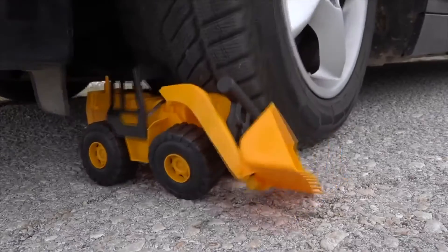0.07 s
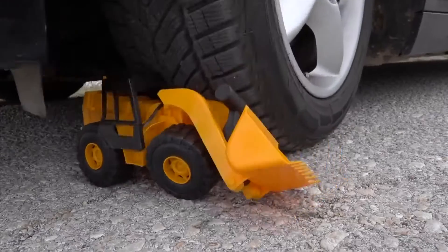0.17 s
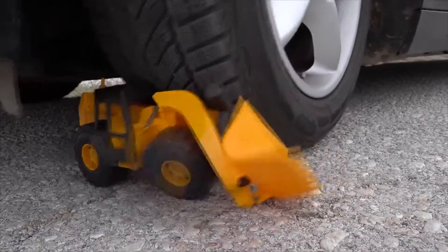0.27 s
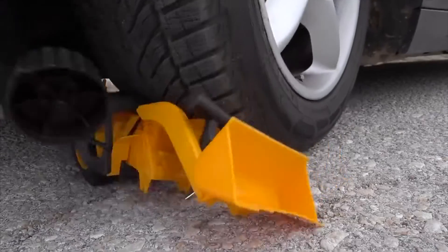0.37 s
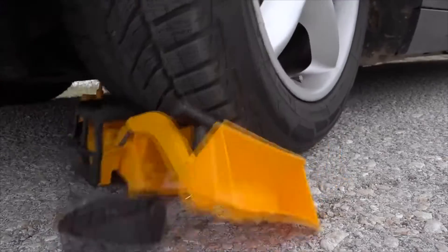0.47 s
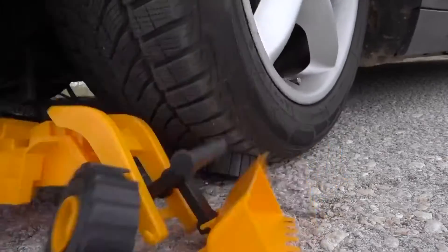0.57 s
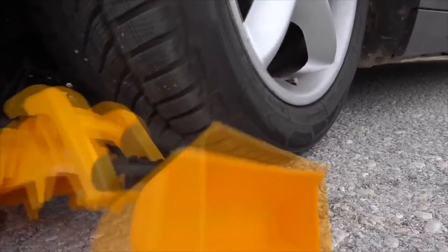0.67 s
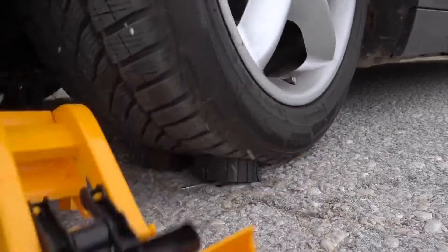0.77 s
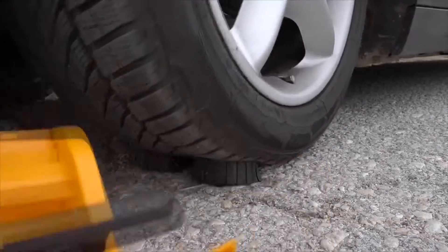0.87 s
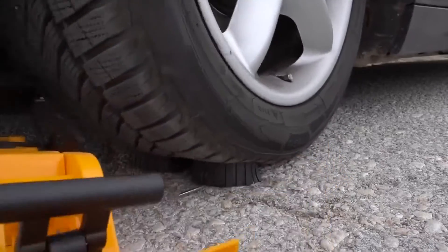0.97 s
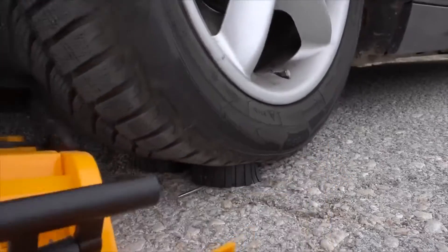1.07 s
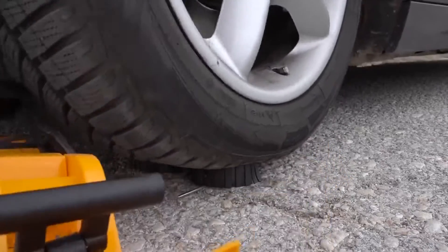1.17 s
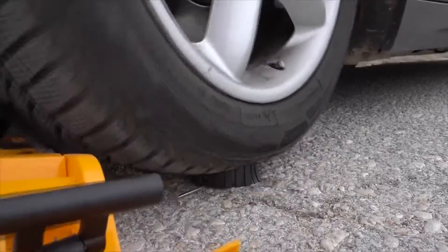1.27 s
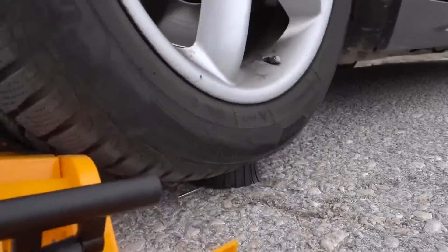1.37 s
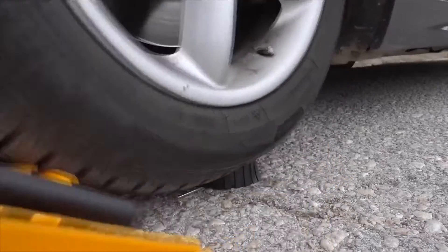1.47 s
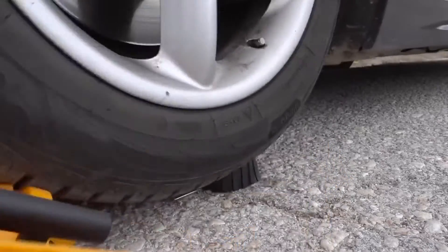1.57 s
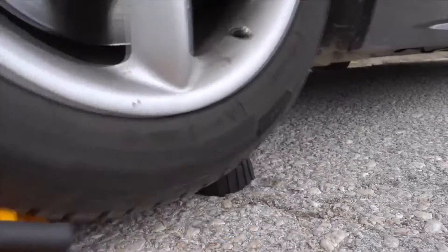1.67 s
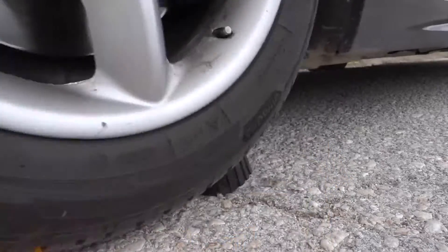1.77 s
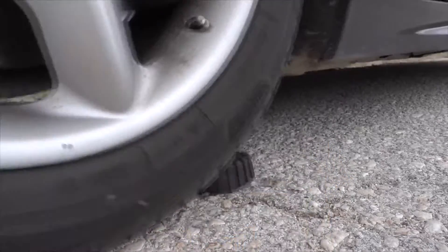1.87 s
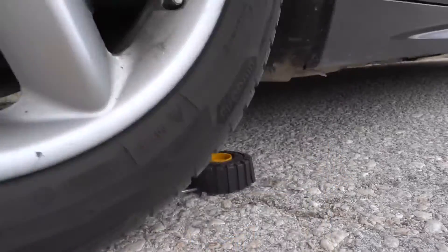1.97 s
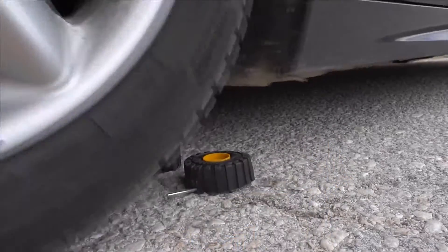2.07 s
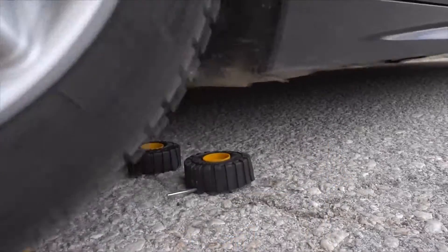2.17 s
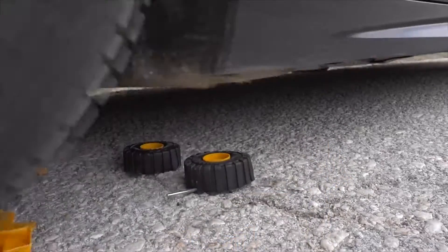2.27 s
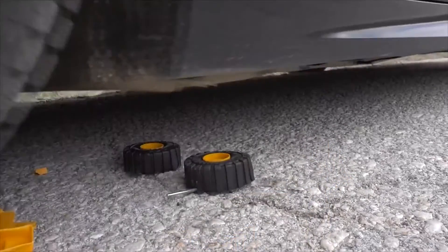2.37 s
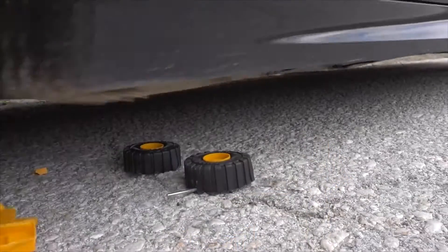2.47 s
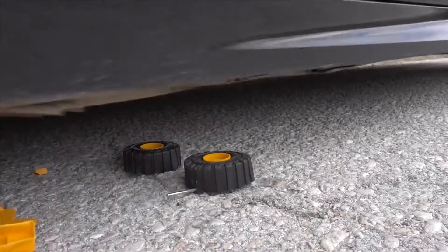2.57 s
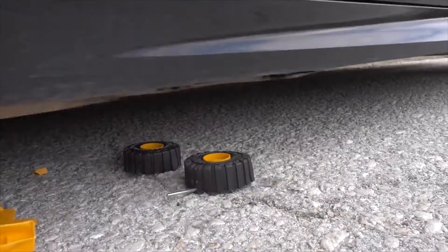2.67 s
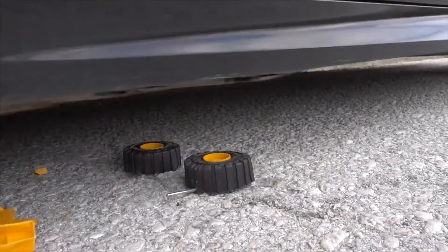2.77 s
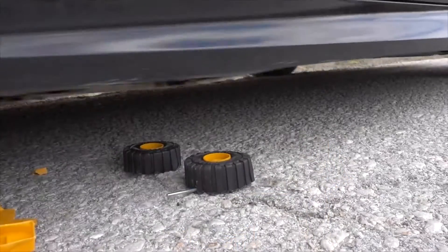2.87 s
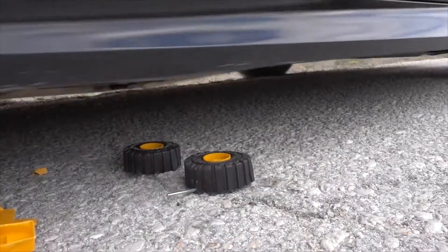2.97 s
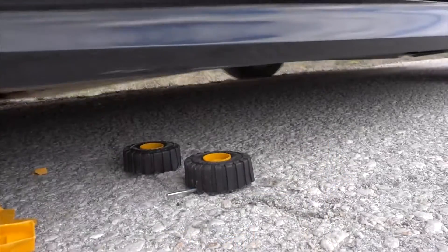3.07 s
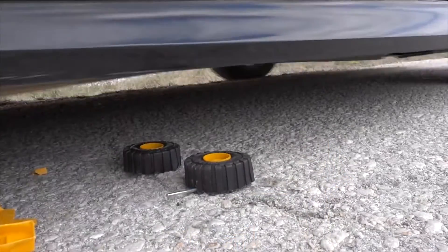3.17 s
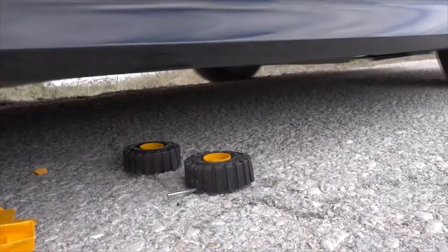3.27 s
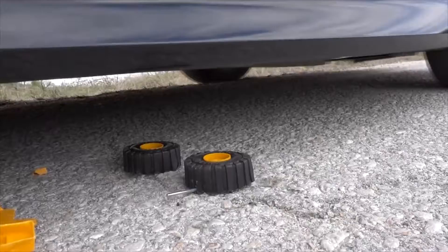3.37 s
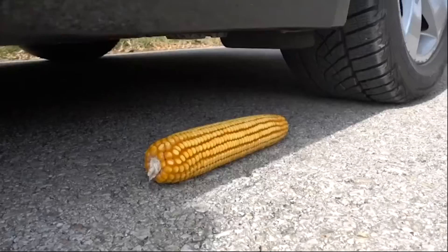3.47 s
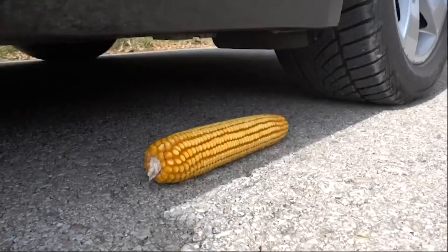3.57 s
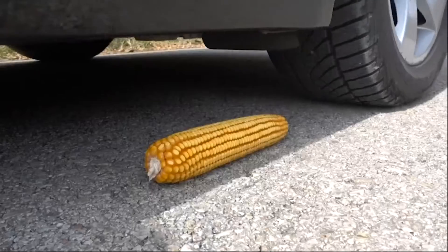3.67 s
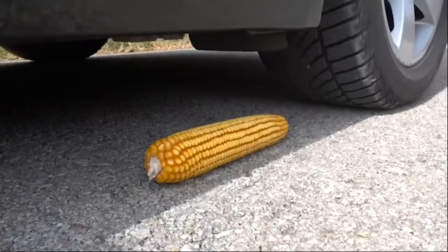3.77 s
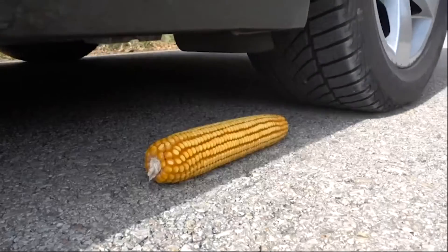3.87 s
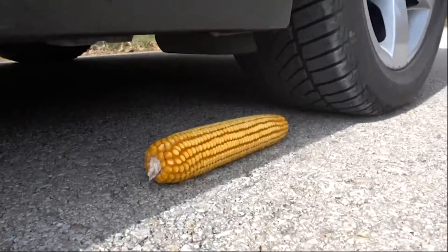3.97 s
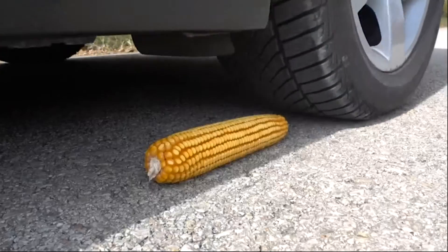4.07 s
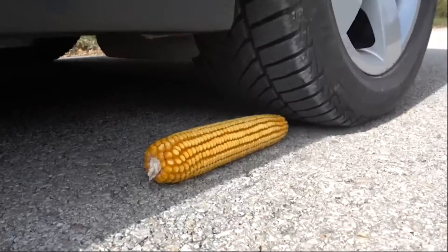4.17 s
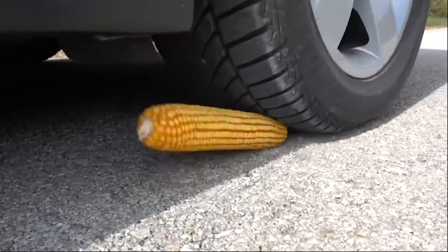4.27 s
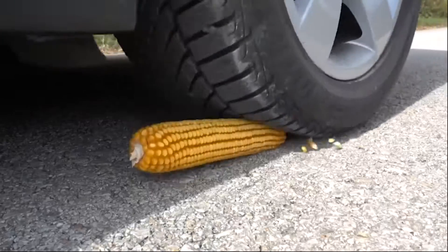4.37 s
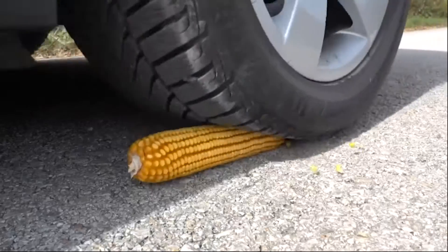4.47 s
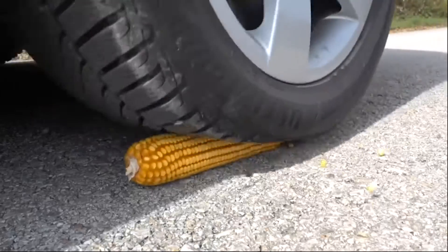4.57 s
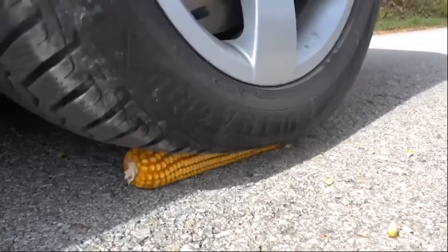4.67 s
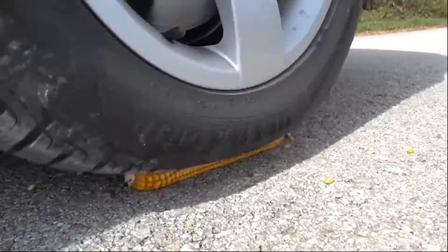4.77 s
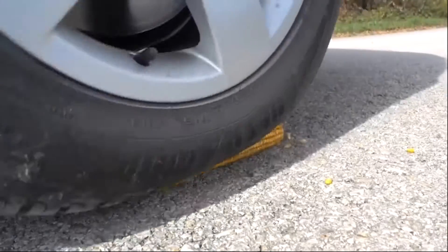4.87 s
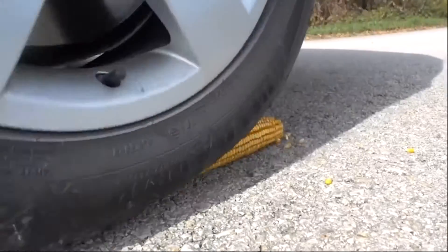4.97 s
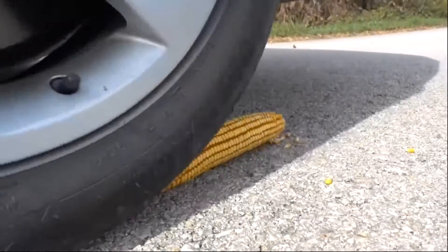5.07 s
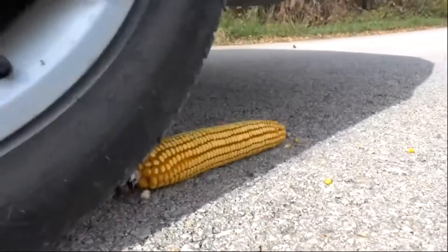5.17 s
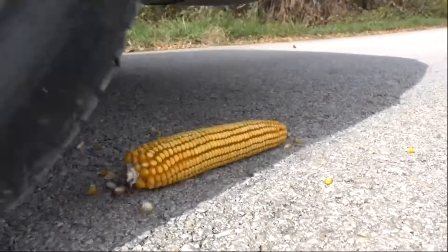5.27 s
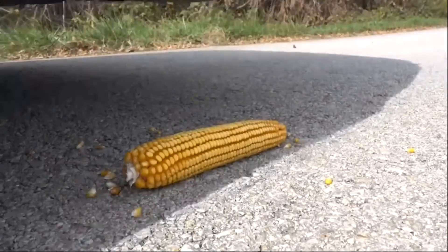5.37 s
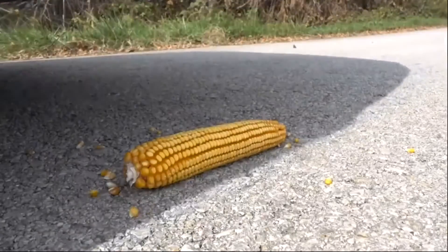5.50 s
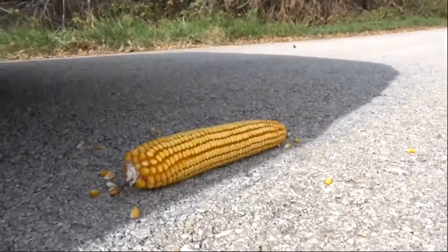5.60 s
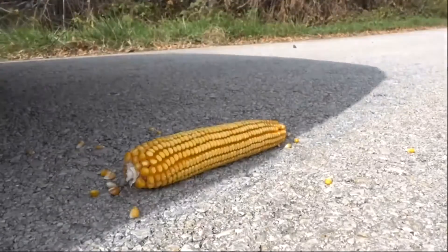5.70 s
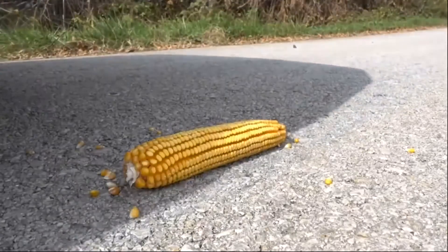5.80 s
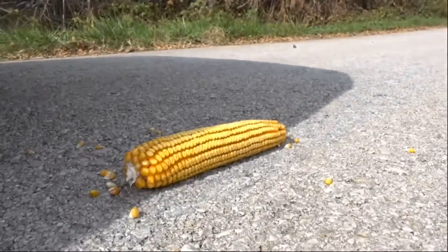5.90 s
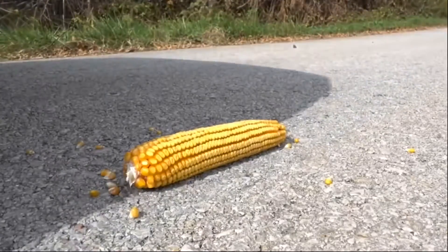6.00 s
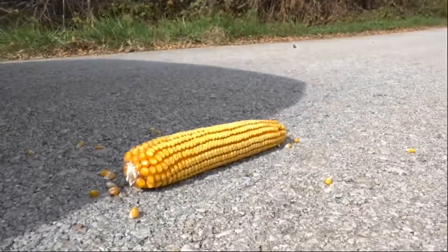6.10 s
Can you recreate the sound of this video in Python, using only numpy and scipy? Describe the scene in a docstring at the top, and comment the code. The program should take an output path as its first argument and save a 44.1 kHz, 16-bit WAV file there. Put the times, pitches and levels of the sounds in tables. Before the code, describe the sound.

Outdoors, very near the tyre, hard plastic shells split in a rapid, uneven series of snaps, with groaning drags and rubbery, plucked creaks midway. A second crushing burst follows, then small pieces tick and settle leftward. A short cut leads to a breezy roadside: low wind thumps, then a dry cob bursts into bright crackling grains and woody pops. The car hums away with a faint squeal while stray kernels click and wind swells.

```python
"""A car tyre rolls over a hollow plastic toy digger on asphalt, then along a dry maize cob in a breeze.
Toy: bursts of tearing noise ring cracked shells over patchy crackle; plucked modes make the wheel creak and
squawk, pulses groan, the hollow tube rings, and clicks and noise make shards tick, skitter and scrape.
A short cut, empty but for faint hiss, leads to the cob: dense grains and ticks crunch, the core pops with
swelling rings, kernels snap, the car hums by, and lumpy low noise makes the wind that buffets the microphone."""
import sys
import numpy as np
from scipy import signal
from scipy.fft import rfft, irfft, next_fast_len
from scipy.io import wavfile

SR = 44100
rng = np.random.default_rng(int(sys.argv[2]) if len(sys.argv) > 2 else 0)


def dump(signal):
    """Clip the signal to [-1, 1] and save it as 16-bit WAV at the path in sys.argv[1]."""
    limited = np.clip(np.atleast_2d(signal).T, -1, 1)
    pcm = np.round(limited * 32767).astype(np.int16)
    wavfile.write(sys.argv[1], SR, pcm)


N = 270685

# crunch colour of the plastic shells: f/Hz, relative level per Hz/dB
SHELL_COLOUR = [(150, -39), (250, -29.5), (420, -11.5), (499, -9.5), (624, -5), (961, -4), (1610, 0),
                (4240, -3), (7000, -11), (15500, -21)]
# ring modes of the cob core: multiple of its pitch, level/dB, t60/s
CORE_MODES = [(1.0, 1.5, 0.021), (.68, -7, 0.022), (1.4, -9, 0.019), (.37, -19, 0.013)]


def from_db(db):
    """Decibels to amplitude factor."""
    return 10 ** (np.asarray(db) / 20)


def rms_one(x):
    """Scale to an rms of 1."""
    return x / np.sqrt(np.mean(x ** 2) + 1e-20)


def in_time(rows):
    """Columns of a time table as curves of N samples."""
    s, *columns = np.transpose(rows)
    return [np.interp(np.arange(N) / SR, s, column) for column in columns]


def at_hz(points, hz):
    """Read a curve between its points on a log frequency axis."""
    point_hz, value = np.array(points).T
    return np.interp(np.log(hz), np.log(point_hz), value)


def drift(rate_hz):
    """Slow chance of spread 1: noise through two equal low-pass poles, computed at every 40th sample."""
    r = np.exp(-80 * np.pi * rate_hz / SR)
    noise = rng.standard_normal(N // 40 + 2002)
    slow = signal.lfilter([1], [1, -2 * r, r * r], noise)[2000:]   # past the filter's start
    return np.interp(np.arange(N) / 40, np.arange(len(slow)), rms_one(slow))


def ring(x, hz, t60):
    """Two-pole resonator: a unit click sets a decaying sine of starting height 1 ringing."""
    r, w = from_db(-60 / (t60 * SR)), 2 * np.pi * hz / SR
    return signal.lfilter([0, np.sin(w)], [1, -2 * r * np.cos(w), r * r], x + 1e-18)


def band(x, low_hz, high_hz):
    """Butterworth band-pass."""
    return signal.sosfilt(signal.butter(2, [low_hz, high_hz], "band", fs=SR, output="sos"), x)


def split(x, corner_hz):
    """Gentle low and high parts, each of rms 1."""
    low = signal.lfilter(*signal.butter(1, corner_hz, fs=SR), x)
    return rms_one(low), rms_one(x - low)


def grains(per_s, spread_db):
    """Two unrelated streams of random clicks of uneven size; rms 1."""
    size_db = spread_db * np.minimum(rng.exponential(1, (2, N)), 5)
    signs = rng.choice([-1, 1], (2, N))
    falls = rng.random((2, N)) < per_s / SR
    return rms_one(from_db(size_db) * signs * falls)


def coloured(pair, spectrum):
    """A mid and a side stream get a spectrum and the likeness of two microphone ports; rms 1."""
    # how alike left and right are: f/Hz, correlation
    likeness = [(60, 1), (180, 1), (550, 0.93), (1650, 0.47), (4970, 0.73), (15000, 0.07)]
    size = next_fast_len(N)
    hz = np.maximum(np.arange(size // 2 + 1) * SR / size, 10)
    alike = np.clip(at_hz(likeness, hz), 0, 1)
    mid, side = rfft(pair, size) * from_db(at_hz(spectrum, hz))
    stereo = np.sqrt(1 + alike) * mid + np.sqrt(1 - alike) * side * [[1], [-1]]
    return rms_one(irfft(stereo, size)[:, :N])


def add(out, s, sound):
    """Mix a short sound in at a time."""
    at = round(s * SR)
    out[..., at:at + sound.shape[-1]] += sound[..., :N - at]


def slip_train(per_s):
    """One unit click for each stick-slip release, at a changing rate."""
    return np.diff(np.floor(np.cumsum(per_s / SR)), prepend=0)


def struck(hits, modes, spread_db):
    """Blows click a bank of resonators, with new strengths for each mode and blow."""
    at, out = [round(s * SR) for s, db in hits], np.zeros(N)
    chance = rng.normal(0, 1, (len(at), len(modes)))
    hit_db = np.array(hits)[:, 1]
    for k, (hz, mode_db, t60) in enumerate(modes):
        clicks = np.zeros(N)
        clicks[at] = from_db(hit_db + mode_db + spread_db * chance[:, k])
        out += ring(clicks, hz, t60)
    return out


def under_car(x):
    """A few dull echoes between road and floor pan, other ones for each side."""
    out, dull = x.copy(), band(x, 200, 8600)
    lags = (rng.uniform(0.002018, .025, 12) * SR).astype(int)
    for k, lag in enumerate(lags):
        source, sign = k // 2 % 2, (-1) ** (k // 4)
        out[k % 2, lag:] += from_db(-15.5 - 400 * lag / SR) * dull[source, :-lag] * sign
    return out


def road():
    """Tyres and distant air: steady coloured noise."""
    # road noise: f/Hz, relative level per Hz/dB
    road_colour = [(24, -49), (40, -6), (178, 2), (421, -1.5), (654, 0.5), (856, -3.5), (1020, -2.5),
                   (3550, -23), (8580, -37), (14000, -37)]
    return from_db(-51.5) * coloured(rng.standard_normal((2, N)), road_colour)


def crackle(load_db, busy):
    """Coarse crackle of crushed shells: bands of random grains swell and fade independently, in patches."""
    body, _ = split(coloured(grains(1500, spread_db=3.5), SHELL_COLOUR), 670)
    patches = np.zeros((2, N))
    for k, hz in enumerate((450, 760, 1280, 2160, 3650, 6170)):
        patches += (-1) ** k * band(body, hz / 1.146, hz * 1.25) * from_db(2.0 * busy * drift(55))
    return from_db(load_db) * rms_one(patches)


def fizz(over_db, busy):
    """Flickering treble of the same plastic: fine grains that grow faster than the load."""
    _, treble = split(coloured(grains(1500, spread_db=3.5), SHELL_COLOUR), 670)
    return treble * from_db(4.0 * busy * drift(45)) * from_db(-41.5 + 1.18 * over_db)


def thuds(over_db):
    """Dull thuds of parts on the road: low noise follows the load, with a slow-dying thump for each big part."""
    # big parts hit the road: t/s, level/dB
    thumps = [(0.088, -28.5), (0.469, -22.5), (2.0, -23), (2.07, -21)]
    rise_s, t60_s = .015, 0.3
    white, t = rng.standard_normal((3, N)), np.arange(SR // 2) / SR
    weight = from_db(-40 + over_db)
    for s, db in thumps:
        add(weight, s, from_db(db - 60 * t / t60_s) * np.minimum(t / rise_s, 1))
    noise = rms_one(band(white[0] + 0.26 * white[1:], 81, 343))
    return noise * weight * from_db(3.13 * drift(33))


def grind():
    """Tread grinds the wreck: its load drives crackle, fizz and thuds between the cracks."""
    # load of the tread on the wreck, as level of the crackle: t/s, level/dB
    loads = [(0, -30.5), (.06, -40.5), (.11, -27), (.24, -40), (.44, -25.5), (.62, -37), (.7, -20.5),
             (.79, -35), (1.0, -40), (1.08, -35.5), (1.15, -48), (1.45, -33.5), (1.62, -38), (1.68, -28),
             (1.71, -27), (1.8, -28.5), (1.945, -26.5), (1.98, -22.5), (2.03, -38.5), (2.1, -23),
             (2.14, -28), (2.18, -38), (2.65, -48), (3.0, -62), (3.35, -56), (3.48, -59)]
    load_db, = in_time(loads)
    over_db = load_db + 35   # over a reference load
    busy = np.clip((load_db + 60) / 15, .6, 1)   # the crackle smooths out as the tread lets go
    return crackle(load_db, busy) + fizz(over_db, busy) + thuds(over_db)


def cracks():
    """A split snaps open and runs through a shell: its tearing holds, then dies away, and rings the piece."""
    # toy shells cracking: t/s, level/dB, ring f/Hz, treble against that level/dB, time to fall 40 dB/s
    shells = [(0.081, -9, 1390, -5, 0.039), (0.087, -5, 974, -27, 0.078), (0.156, -14, 3730, -1.5, 0.079),
              (0.165, -16.5, 2300, -25, 0.024), (0.2338, -10, 1400, -30, 0.022),
              (0.2663, -2.5, 610, -15, 0.041), (0.29, -8, 1410, -17, 0.025),
              (0.337, -22.5, 1070, -8.5, 0.055), (0.361, -8.5, 1950, -13.5, 0.054),
              (0.382, -12, 1270, -13, 0.028), (0.409, -12, 1810, -1, 0.037), (0.416, -1, 1800, -15, 0.036),
              (0.436, -8, 745, -14.5, 0.08), (0.462, -12, 1330, -20.5, 0.087), (0.531, -15, 3940, 0, 0.048),
              (0.55, -10, 1520, -36, 0.065), (0.5794, -11.5, 2130, -5, 0.018),
              (0.589, -10.5, 1770, -10, 0.045), (0.631, -3, 1320, -8, 0.054), (0.652, -12, 1550, -8, 0.18),
              (0.725, -8, 1210, -27, 0.086), (0.794, -13, 1730, -5.5, 0.05),
              (0.811, -14.5, 1810, -35, 0.041), (0.841, -13.5, 895, -21, 0.12),
              (0.86, -19, 3120, -11, 0.017), (0.892, -4.5, 1130, -18.5, 0.038),
              (0.97, -19, 1160, -8.5, 0.028), (1.025, -15.5, 1090, -32, 0.046),
              (1.138, -10, 980, -26, 0.029), (1.361, -15.5, 2390, -44, 0.039),
              (1.387, -13.5, 2770, -40, 0.013), (1.412, -11.5, 1400, -12.5, 0.047),
              (1.501, -14.5, 1980, -7.5, 0.073), (1.533, -15.5, 2010, -36, 0.074),
              (1.5622, -10.5, 1310, -9.5, 0.076), (1.6, -10.5, 800, -50, 0.08),
              (1.651, -9.5, 1020, -25, 0.068), (1.666, -10.5, 2300, -26, 0.033),
              (1.682, -5, 1150, -21, 0.039), (1.699, -8, 830, -29, 0.055), (1.717, -2.5, 800, -12.5, 0.073),
              (1.76, -10.5, 2870, -8.5, 0.025), (1.799, -5, 575, -15, 0.31),
              (1.831, -0.5, 920, -7.5, 0.023), (1.928, -7.5, 1900, -10, 0.03),
              (1.959, -5, 1030, -6.5, 0.098), (1.991, -8, 640, -29, 0.13), (2.052, -7, 1480, -3.5, 0.078),
              (2.145, -3.5, 694, -10.5, 0.036), (2.202, -30, 1190, -2, 0.087),
              (2.225, -10.5, 1180, -10, 0.031), (2.275, -22, 2880, 0.5, 0.021),
              (2.34, -15, 740, -15, 0.062), (2.433, -37, 2720, 7, 0.023), (2.473, -27.5, 930, -19, 0.1),
              (2.515, -31, 2440, -5, 0.074), (2.547, -24, 587, -8, 0.026), (2.564, -16, 725, -7.5, 0.013),
              (2.589, -32.5, 2830, 1, 0.047),]
    crest_db = 12.5   # nominal peak over the mean level of the tearing
    dull_over_ring, dull_share = 5.9, 0.12   # dulling corner over ring pitch; dB of dulling per dB of treble
    out, t = np.zeros((2, N)), np.arange(SR // 7) / SR
    body, treble = split(coloured(grains(3000, spread_db=3.0), SHELL_COLOUR), 5300)
    snap = band(t == 0, 250, 6300)
    overtones = 2 ** rng.uniform(-0.69, 2.365, (len(shells), 4))   # every piece has modes of its own
    for (s, level_db, hz, treble_db, length), multiples in zip(shells, overtones):
        at = round(s * SR)
        fall = from_db(-40 * (t / max(length, .01)) ** 1.397) * np.minimum(t / 0.0017, 1)
        burst = body[:, at:at + len(t)] * fall + 9.0 * snap
        corner_hz = min(hz * dull_over_ring, 9000)
        dull = signal.sosfilt(signal.butter(2, corner_hz, fs=SR, output="sos"), burst)
        burst = dull + (burst - dull) * from_db(dull_share * min(treble_db, 0))
        push = burst.mean(axis=0)
        piece = ring(push, hz, 11.1 / hz) * hz / SR
        for mode_hz in np.minimum(hz * multiples, 9000):
            piece += .3 * ring(push, mode_hz, 20.0 / mode_hz) * np.sqrt(hz * mode_hz) / SR
        bright = treble[:, at:at + len(t)] * fall ** 1.01 * from_db(level_db + treble_db)
        add(out, s, from_db(level_db - crest_db) * (burst + 4.5 * piece) + bright)
    return out


def knocks():
    """A loose solid part drops on the road: a short dull blow with no ring of its own."""
    # drops: t/s, peak/dB
    drops = [(.268, -9), (1.958, -15), (2.144, -15), (2.343, -13)]
    out = np.zeros(N)
    blow = band(band(np.arange(SR // 20) == 0, 230, 1100), 230, 1100)
    for s, peak_db in drops:
        add(out, s, from_db(peak_db) * blow / np.abs(blow).max())
    return out


def groans():
    """Plastic dragged over asphalt sticks and slips unevenly; the pulses ring the hollows near the centre."""
    # fast slips run together: start t/s, length/s, level/dB, centre f/Hz
    drags = [(0.464, 0.071, -17.5, 427), (0.735, 0.046, -19.5, 1050), (1.049, 0.044, -15.5, 910),
             (1.771, 0.031, -18.5, 590), (1.847, 0.045, -16, 670), (2.006, 0.058, -19, 640)]
    out = np.zeros(N)
    train = slip_train(210 * from_db(3.0 * drift(60))) * from_db(rng.normal(0, 2.0, N))
    train = band(train, 150, 2900)   # slips are soft
    for s, length, level_db, centre_hz in drags:
        slips = train[round(s * SR):round((s + length) * SR)]
        hollows = np.zeros(len(slips))
        for hz in 220 * 2 ** np.arange(0, 2.8, .2):
            near = np.exp(-.5 * (np.log2(hz / centre_hz) / 0.15) ** 2)
            hollows += ring(slips * near, hz, 8.4 / hz)
        add(out, s, rms_one(hollows) * from_db(level_db) * np.hanning(len(slips)))
    return out


def tube():
    """Knocks set the long, low modes of a hollow tube ringing."""
    # knocks on the tube: t/s, level/dB
    tube_hits = [(.66, -33), (1.1, -37), (1.97, -30), (2.15, -30)]
    # tube modes: f/Hz, level/dB, t60/s
    tube_modes = [(215, 0, 1.0), (425, -3, 0.9), (630, -1, 0.8)]
    return struck(tube_hits, tube_modes, spread_db=1.5)


def squawk():
    """Nearly even slips of the loaded toy wheel pluck its rim so fast that they merge into a pitch."""
    # slipping under load: t/s, level/dB, slips per second/Hz
    slipping = [(.862, -30, 240), (.875, -13.5, 304), (.9, -30, 272), (.907, -15, 147), (.913, -12.5, 220),
                (.924, -20.5, 200), (.93, -9, 245), (.955, -12.5, 278), (.96, -40, 200)]
    # rim modes: f/Hz, level/dB, t60/s
    rim_modes = [(1090, -0.5, 0.03), (670, 4, 0.0037), (2320, -9, 0.01)]
    level_db, per_s = in_time(slipping)
    t = np.arange(N) / SR
    active = (t > slipping[0][0]) * (t < slipping[-1][0])
    slips = slip_train(per_s * from_db(0.15 * drift(95))) * active
    slips = slips * from_db(level_db + rng.normal(0, 2.2, N))
    rim = sum(from_db(db) * ring(slips, hz, t60) for hz, db, t60 in rim_modes)
    return band(rim, 330, 1280)


def creaks():
    """Each slip of the squeezed toy wheel plucks its hollow rim; the slip takes a moment to let go and chatters."""
    # toy wheel slipping: t/s, level/dB, f/Hz
    wheel_slips = [(0.976, -16, 1090), (1.041, -11, 1260), (1.047, -6.5, 1120), (1.102, -8.5, 657),
                   (1.112, -8.5, 960), (1.141, -9, 1090), (1.168, -17, 1020), (1.179, -8, 1060),
                   (1.184, -6.5, 1090), (1.22, -19, 1030), (1.226, -14.5, 1040), (1.231, -6.5, 1030),
                   (1.254, -15, 1010), (1.267, -11.5, 1064), (1.281, -12, 980), (1.29, -13, 1023),
                   (1.313, -10, 1000), (1.335, -9.5, 1040), (1.35, -14, 1060), (1.368, -13.5, 890),
                   (1.607, -7.5, 850)]
    # upper rim modes: f/Hz before bending, level/dB, t60/s
    upper_modes = [(2204, -15, 0.02), (2540, -23, 0.015), (3500, -31, 0.01)]
    t60_s, rim_bends = 0.025, .04   # decay of the main tone; spread of upper-mode pitch, as a share
    out, t = np.zeros(N), np.arange(SR // 15) / SR
    chance = rng.normal(0, 1, (len(wheel_slips), len(upper_modes), 2))
    chatter = 1 + .35 * rms_one(band(rng.standard_normal((len(wheel_slips), len(t))), 100, 700))
    for (s, level_db, hz), draws, rough in zip(wheel_slips, chance, chatter):
        pluck = from_db(-60 * t / t60_s) * np.sin(2 * np.pi * hz * t)
        for (mode_hz, db, t60), (strength, bend) in zip(upper_modes, draws):
            # harder slips wake the upper modes more
            mode_gain = from_db(db + 3.0 * strength + level_db + 9.5 - 60 * t / t60)
            pluck = pluck + mode_gain * np.sin(2 * np.pi * mode_hz * (1 + rim_bends * bend) * t)
        release = 1 - np.exp(-t / 0.00059)
        add(out, s, from_db(level_db) * release * pluck * rough)
    return out


def skitter():
    """Light shards slide and tick over the asphalt: dense bright grains at a drifting level."""
    start_s, end_s = 1.41, 2.564
    t = np.arange(N) / SR
    moving = np.interp(t, [start_s - .05, start_s, end_s, end_s + 0.14], [0, 1, 1, 0])
    shards = rms_one(band(grains(3400, spread_db=1.5), 2500, 11000))
    return from_db(-47 + 4.5 * drift(40)) * moving * shards


def snaps(rows, cycles, spray_share):
    """A small hard thing bursts or ticks: a click that dies within a few cycles, with a short spray of grit."""
    out, t = np.zeros((2, N)), np.arange(SR // 40) / SR
    grit, sides = rng.standard_normal((len(rows), 2, len(t))), rng.normal(0, 1, (len(rows), 1))
    for (s, level_db, hz), spray, side in zip(rows, grit, sides):
        click = np.sin(2 * np.pi * hz * t) * from_db(-60 * t * hz / cycles)
        burst = click + spray_share * band(spray, 1200, 9600) * from_db(-60 * t / 0.0066)
        add(out, s, from_db(level_db + 0.5 * side * [[1], [-1]]) * burst)
    return out


def scrape():
    """A last shard slides: a rough tone that rises."""
    start_s, length_s, level_db, from_hz, to_hz = 3.148, .065, -46, 730, 930
    out, count = np.zeros(N), round(length_s * SR)
    rough = 1 + 0.66 * rms_one(band(rng.standard_normal(count), 30, 190))
    tone = np.sin(2 * np.pi * np.cumsum(np.linspace(from_hz, to_hz, count)) / SR)
    add(out, start_s, from_db(level_db) * np.hanning(count) * rough * tone)
    return out


def toy_place():
    """The toy under the tyre, off to the left, with short echoes off the car's underside."""
    # small shards ticking on the road: t/s, level/dB, f/Hz
    shard_ticks = [(2.318, -23, 1770), (2.474, -23.5, 1530), (2.529, -16, 2370), (2.606, -18, 1660),
                   (2.65, -26, 2560), (2.677, -27, 3070), (2.743, -29, 4300), (2.752, -30, 1090),
                   (3.087, -43, 5500), (3.117, -38, 2000), (3.218, -39, 1890)]
    # where the wreck lies: t/s, left over right in the middle range/dB
    wreck_side = [(0.0, 2), (.84, 4.5), (1.15, 8.5), (1.7, 4.5), (2.42, 8), (2.67, 14), (2.9, 14.5),
                  (3.49, 16.5)]
    lag_per_s = 1.4   # growing lag of the right side, samples per second
    close = cracks() + knocks() + groans() + squawk() + creaks() + scrape()
    close = close + snaps(shard_ticks, cycles=16.0, spray_share=0.18)
    wreck = under_car(band(close, 120, 18000)) + grind() + skitter()
    middle = band(wreck, 390, 10800)
    side_db, = in_time(wreck_side)
    wreck = wreck + middle * (from_db(side_db * [[.5], [-.5]]) - 1)
    late = np.round(np.arange(N) * (1 - lag_per_s / SR)).astype(int)
    wreck[1] = wreck[1][late]   # the wreck drifts left
    return wreck + tube() + road()


def scuff():
    """A scuff of grit opens the second place: a moment of band noise, cut off short."""
    noise = rms_one(band(rng.standard_normal((2, N)), 270, 1970))
    return from_db(-37.5) * noise * (np.arange(N) / SR < 3.543)


def splits():
    """Lesser kernels split at random, each a short tick at one of twelve pitches; rms 1."""
    clicks = grains(480, spread_db=3.0)
    clicks = clicks[0] + .5 * clicks   # partly shared by both sides
    dealt = rng.integers(0, 12, N)
    out = np.zeros((2, N))
    for k, hz in enumerate(np.geomspace(2300, 9500, 12)):
        out += ring(clicks * (dealt == k), hz, 3.2 / hz)
    return rms_one(out)


def crunch(press_db):
    """Kernels leave the cob: dense coloured grains at a drifting level, with the ticks of lesser splits."""
    # crunch colour of dry kernels: f/Hz, relative level per Hz/dB
    kernel_colour = [(940, -10), (1600, -12), (3080, -8), (3950, -6), (5370, -8), (8570, -8), (11000, -7),
                     (14300, -15.5)]
    kernels = coloured(grains(6000, spread_db=5.0), kernel_colour)
    return from_db(press_db - 4 + 2.5 * drift(60)) * kernels + from_db(press_db - 11) * splits()


def hum(press_db):
    """The car rolling by, and the pressed cob in the middle range: coloured noise at a slowly drifting level."""
    # the car rolling by: t/s, level/dB
    car_level = [(3.53, -61), (3.65, -54), (4.3, -52.5), (4.9, -40), (5.3, -43.5), (6.0, -45.5),
                 (6.13, -52)]
    # hum: f/Hz, relative level per Hz/dB
    hum_colour = [(180, -53), (300, -1.5), (719, 4), (1400, -4), (2100, -7.5), (2330, -11), (2920, -9.5),
                  (11000, -42.5), (14300, -68)]
    car_db, = in_time(car_level)
    gain = from_db(car_db) + from_db(press_db - 8.5)
    return gain * from_db(3.05 * drift(14.7)) * coloured(rng.standard_normal((2, N)), hum_colour)


def rumble(press_db):
    """Bass of the pressed cob: low band noise that follows the tyre's pressing."""
    noise = rms_one(band(rng.standard_normal(N), 135, 303))
    return from_db(press_db - 10.5 + 3.3 * drift(26)) * noise


def core_creak(press_db):
    """Lesser breaks inside keep the core ringing: random clicks through its modes."""
    core_hz = 617
    breaks = grains(300, spread_db=4.5)[0]
    rings = sum(from_db(db) * ring(breaks, k * core_hz, t60) for k, db, t60 in CORE_MODES)
    return from_db(press_db - 8.0) * rms_one(rings)


def wind():
    """Eddies at the microphone ports: lumpy low noise whose centre rises with the gust, over a slow heave."""
    # gusts: t/s, level/dB
    gusts = [(3.53, -55), (3.7, -35.5), (3.97, -47), (4.21, -34.5), (4.32, -39), (4.45, -26.5), (4.65, -54),
             (4.9, -26.5), (5.05, -42), (5.2, -33.5), (5.28, -41), (5.5, -34), (5.76, -31.5), (5.85, -33.5),
             (5.95, -23), (6.04, -24), (6.13, -18.5)]
    calm_db, calm_hz, octaves_per_db = -45, 95, .018   # the centre stands at calm_hz when the gust is at calm_db
    spread_octaves = .65
    level_db, = in_time(gusts)
    centre_hz = calm_hz * 2 ** (octaves_per_db * (level_db - calm_db))
    common, own = rng.standard_normal(N), rng.standard_normal((2, N))
    out = np.zeros((2, N))
    for hz in 40 * 2 ** np.arange(0, 3.6, .5):
        near = np.exp(-.5 * (np.log2(hz / centre_hz) / spread_octaves) ** 2)
        out += near * rms_one(band(common + 0.83 * own, hz / 1.304, hz * 1.16))
    out += from_db(-5) * rms_one(band(common + 0.18 * own, 24.5, 84))   # heave
    return from_db(level_db + 1.34 * drift(25)) * out


def buffets():
    """A single eddy rocks the microphone for a few cycles: a low sine under a bell-shaped swell."""
    # eddies: middle t/s, peak/dB, f/Hz, number of cycles
    eddies = [(3.773, -25.5, 88, 1.33), (3.899, -33, 85, 3.3), (4.029, -29.5, 127.7, 2.5),
              (4.169, -21.5, 106, 4), (4.242, -19.5, 172, 1.8), (4.267, -18.5, 176, 3.2),
              (4.417, -15, 232, 1.55), (4.441, -21.5, 198, 2.8), (4.903, -19.5, 192, 5.3),
              (5.294, -16.5, 105, 1.9), (5.314, -14.5, 123, 1.4), (5.734, -15, 111, 2),
              (5.75, -16, 175, 3.4), (5.862, -18, 188, 1.9), (5.903, -17.5, 256, 1.54),
              (5.947, -12.5, 141, 2.04), (5.967, -18, 121, 2), (5.996, -20.5, 465, 4.5),
              (6.043, -16, 240, 1.2), (6.08, -14, 160, 1.5), (6.125, -15.5, 188, 4.5)]
    out = np.zeros(N)
    for s, peak_db, hz, turns in eddies:
        cycles = np.arange(round(turns * SR / hz)) * hz / SR
        rock = np.hanning(len(cycles)) * np.sin(2 * np.pi * cycles)
        add(out, s - turns / hz / 2, from_db(peak_db) * rock)
    return out


def pops():
    """The core gives way through soft rubber: swelling rings shift with the squeezed part, and the cob hums on."""
    # cob core giving way: t/s, level/dB, core ring f/Hz
    breaks = [(4.392, -21, 636), (4.462, -14.5, 624), (4.473, -8.5, 707), (4.497, -10.5, 613),
              (4.546, -16.5, 626), (4.562, -18, 600), (4.6, -16, 715), (4.609, -10, 734),
              (4.6545, -10.5, 665), (4.687, -13, 633), (4.692, -8, 658), (4.713, -8, 674),
              (4.723, -10.5, 670), (4.756, -10, 660), (4.77, -7.5, 586), (4.785, -10, 624),
              (4.791, -6, 643), (4.8045, -5, 600), (4.925, -22, 686), (4.946, -7, 630), (4.958, -8.5, 623),
              (4.968, -15, 660), (4.984, -11.5, 750), (5.105, -23.5, 770), (5.119, -16, 750),
              (5.176, -19, 557)]
    rise_s = 0.0005
    out, t = np.zeros(N), np.arange(SR // 15) / SR
    chance = rng.normal(0, 1, (len(breaks), len(CORE_MODES)))
    for (s, level_db, hz), draws in zip(breaks, chance):
        for (k, db, t60), strength in zip(CORE_MODES, draws):
            fall = from_db(level_db + db + 1.7 * strength - 60 * t / t60)
            swell = (1 - np.exp(-t / rise_s)) * fall
            add(out, s, swell * np.sin(2 * np.pi * k * hz * t))
    after_ring = (668, -27, 0.28)   # the whole cob: f/Hz, level/dB, t60/s
    return out + struck([row[:2] for row in breaks], [after_ring], spread_db=3.0)


def whine():
    """A faint squeal as the car rolls off: two thin tones swell and fade, wavering a little."""
    start_s, end_s = 5.33, 5.48
    out, count = np.zeros(N), round((end_s - start_s) * SR)
    for hz, db in ((2121, -57), (2961, -60)):
        waver = 1 + .006 * drift(15)[:count]
        tone = np.sin(2 * np.pi * np.cumsum(hz * waver) / SR)
        add(out, start_s, from_db(db) * np.sqrt(np.hanning(count)) * tone)
    return out


def cob_place():
    """The cob under the tyre in a breeze, slightly to the left and without the top treble."""
    # tyre pressing kernels off the cob: t/s, level/dB
    pressing = [(3.53, -66), (4.1, -69), (4.33, -64.5), (4.345, -27), (4.8, -26), (4.83, -34),
                (4.91, -36.5), (4.95, -25), (5.01, -26), (5.05, -37.5), (5.3, -44.5), (5.36, -52.5),
                (5.85, -63.5), (6.13, -64)]
    # kernels and grit snapping: t/s, level/dB, f/Hz
    kernel_snaps = [(3.941, -37, 3160), (4.141, -36, 2140), (4.356, -17, 7120), (4.381, -14, 2770),
                    (4.3925, -14.5, 2000), (4.4427, -12, 6650), (4.4683, -8, 6150), (4.5255, -13, 3520),
                    (4.5615, -3.5, 4300), (4.578, -15, 1900), (4.6154, -9, 3580), (4.6355, -12, 1860),
                    (4.6454, -8, 4280), (4.6534, -14, 3500), (4.6746, -6.5, 8330), (4.687, -4, 4900),
                    (4.6914, -12, 4500), (4.713, -14, 4020), (4.7556, -14, 4110), (4.7695, -15, 3900),
                    (4.784, -8, 4470), (4.792, -1, 4140), (4.8886, -11, 4150), (4.9257, -10.5, 2210),
                    (4.9318, -16, 3730), (4.9536, -9, 5850), (4.959, -10, 5080), (4.9674, -18, 3350),
                    (4.9793, -9, 3370), (5.0034, -12, 2160), (5.1057, -19, 2000), (5.122, -17, 2500),
                    (5.1556, -32, 1560), (5.6043, -26, 1960), (5.7025, -28, 1840), (5.7427, -26, 1670),
                    (5.8815, -31, 1500)]
    press_db, = in_time(pressing)
    core = band(pops() + core_creak(press_db), 150, 2200)   # soft contact through the rubber
    close = under_car(core + snaps(kernel_snaps, cycles=8.4, spray_share=0.3))
    pressed = crunch(press_db) + hum(press_db) + rumble(press_db)
    both = close + pressed + scuff() + wind() + buffets() + whine()
    both = both * from_db([[.3], [-.3]])
    return signal.sosfilt(signal.cheby2(10, 30, 11200, fs=SR, output="sos"), both)


def scene():
    """The toy, a short cut, then the cob, with a faint hiss throughout."""
    t = np.arange(N) / SR
    hiss = from_db(-83.0) * band(rng.standard_normal((2, N)), 60, 3000)
    return toy_place() * (t < 3.489) + cob_place() * (t > 3.523) + hiss


def record(dry):
    """The microphone drops the deepest bass, peaks are rounded, the top is cut."""
    thin = signal.sosfilt(signal.butter(2, 45, "high", fs=SR, output="sos"), dry)
    rounded = np.tanh(thin)
    return signal.sosfilt(signal.cheby2(14, 70, 16900, fs=SR, output="sos"), rounded)


dry = scene()
out = record(dry)
dump(out)
```